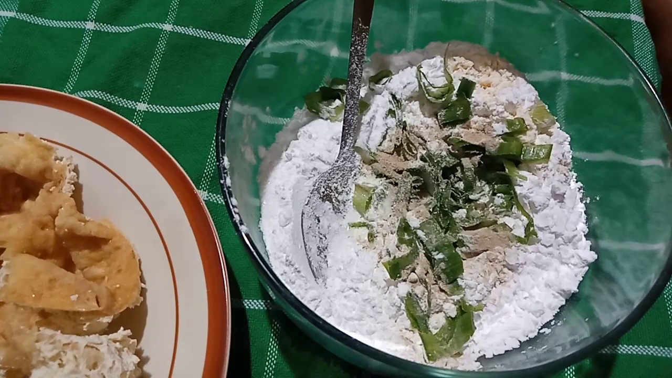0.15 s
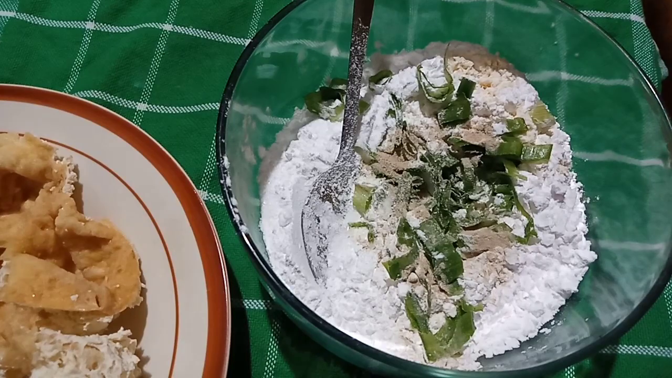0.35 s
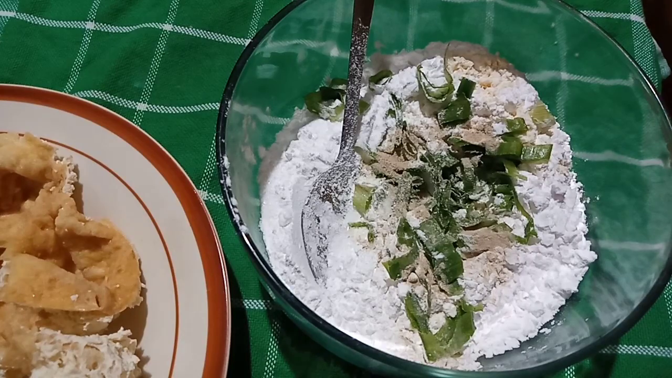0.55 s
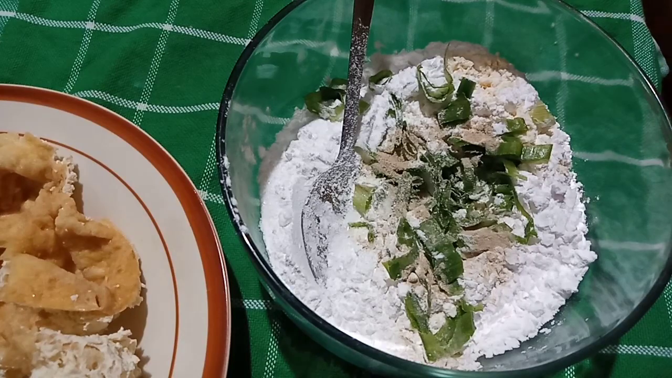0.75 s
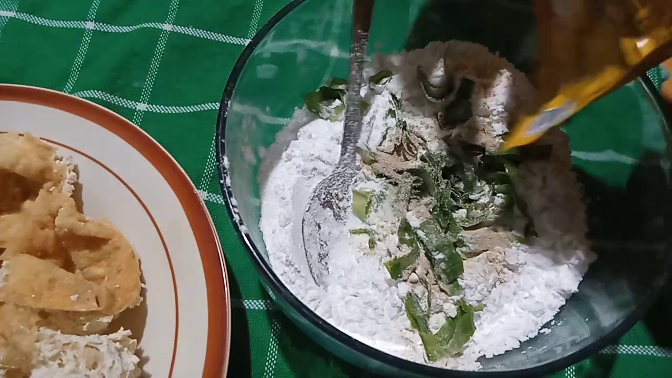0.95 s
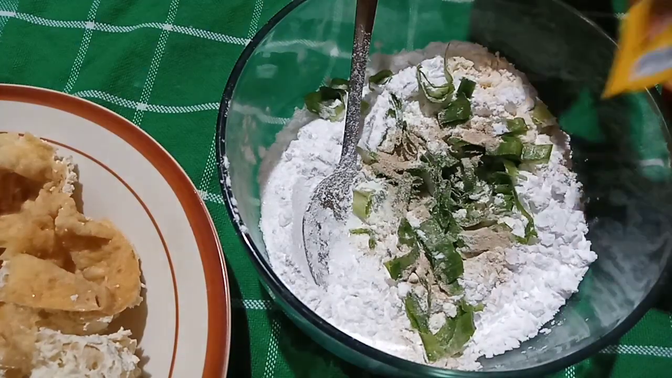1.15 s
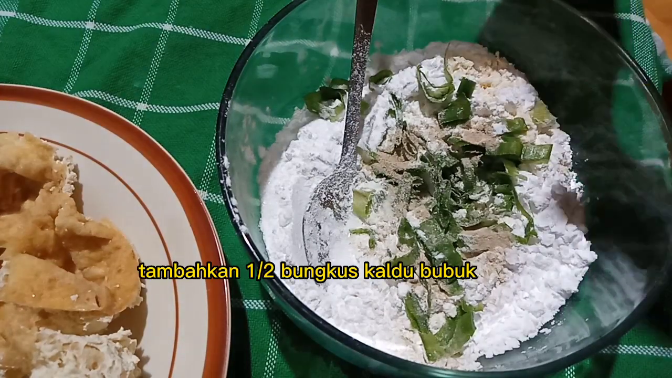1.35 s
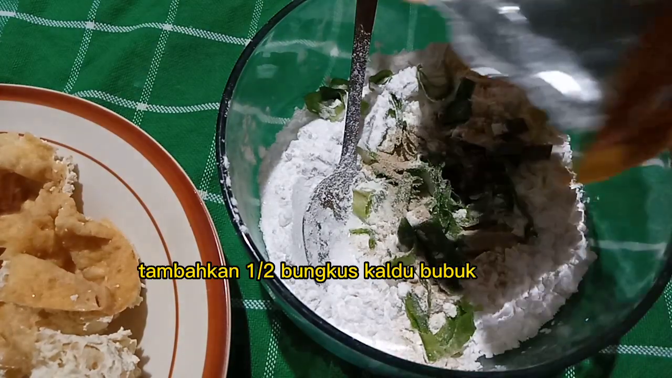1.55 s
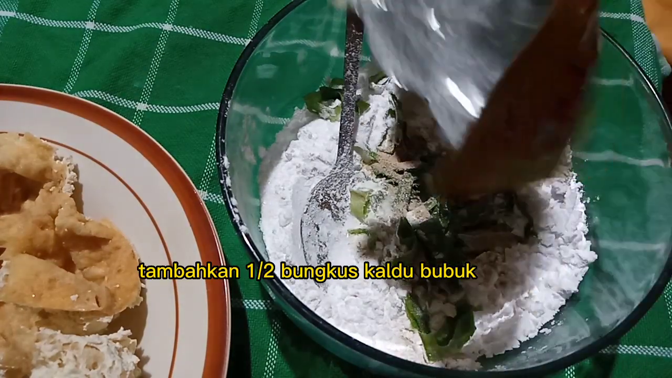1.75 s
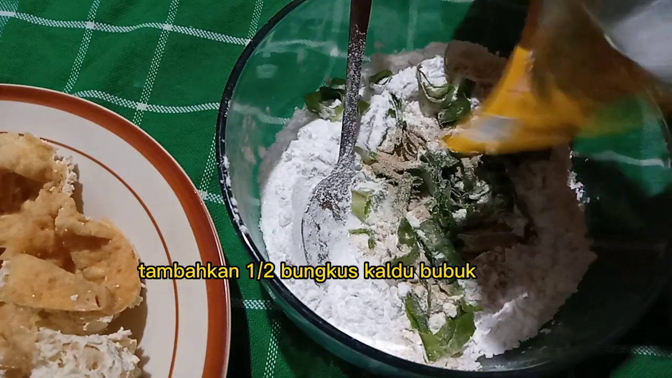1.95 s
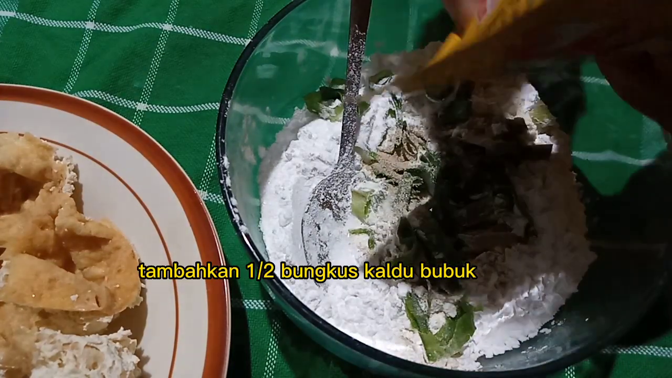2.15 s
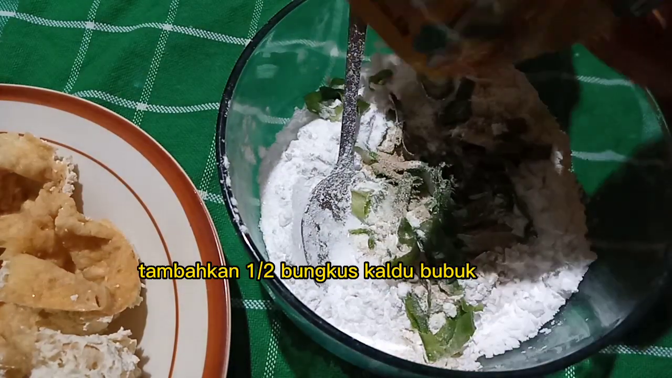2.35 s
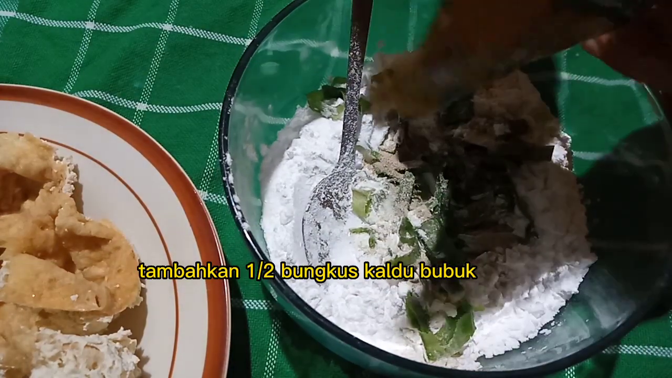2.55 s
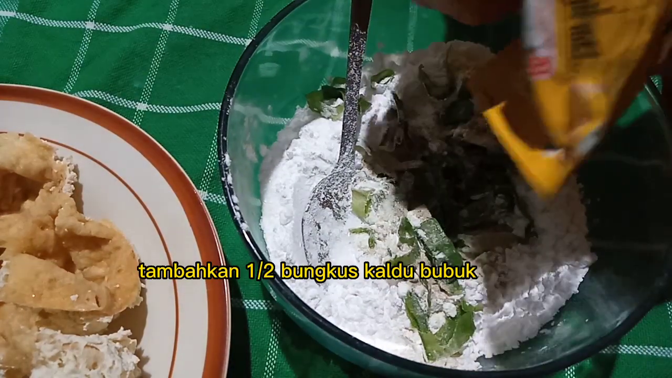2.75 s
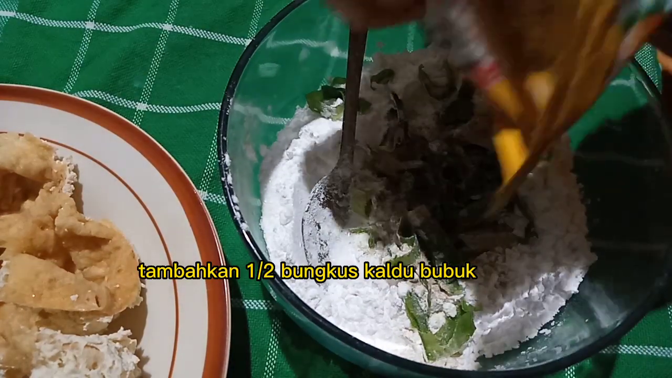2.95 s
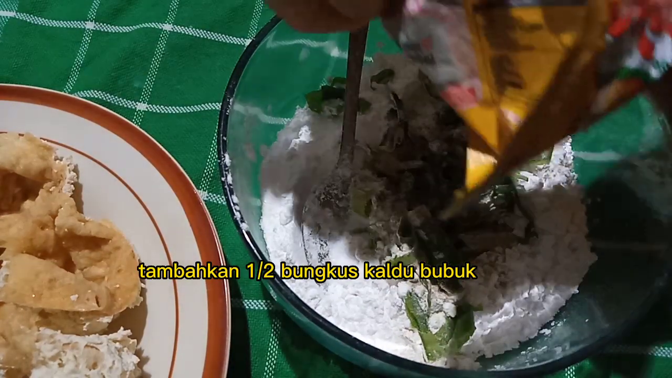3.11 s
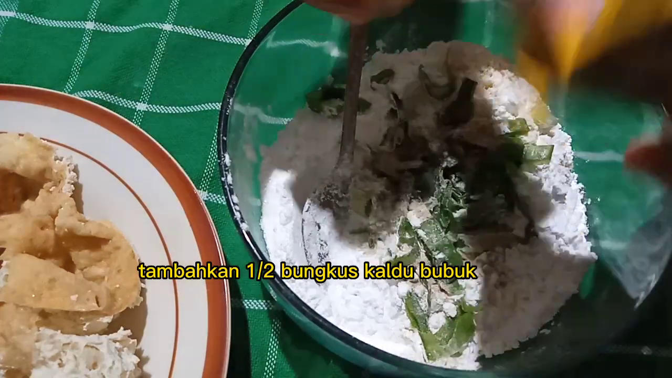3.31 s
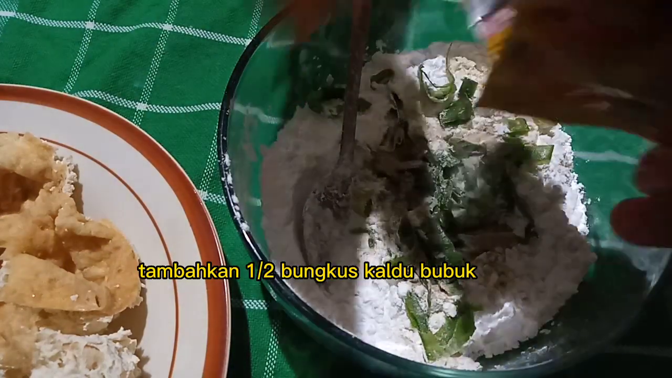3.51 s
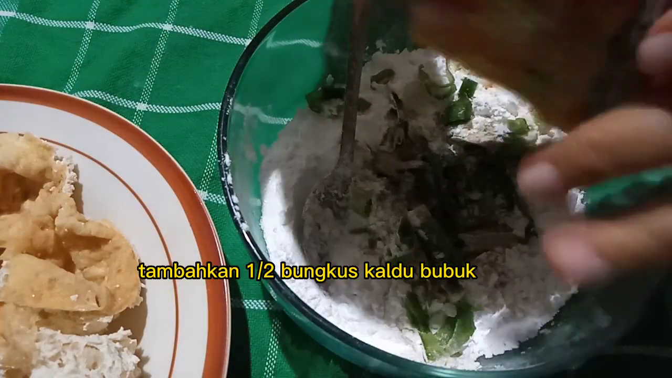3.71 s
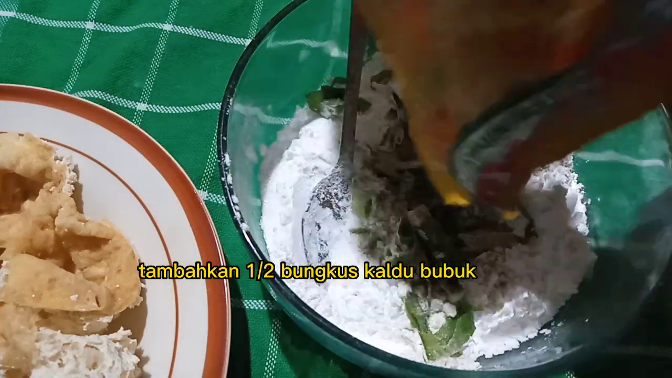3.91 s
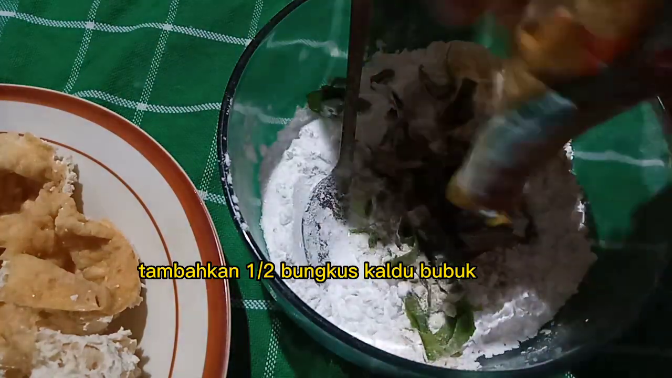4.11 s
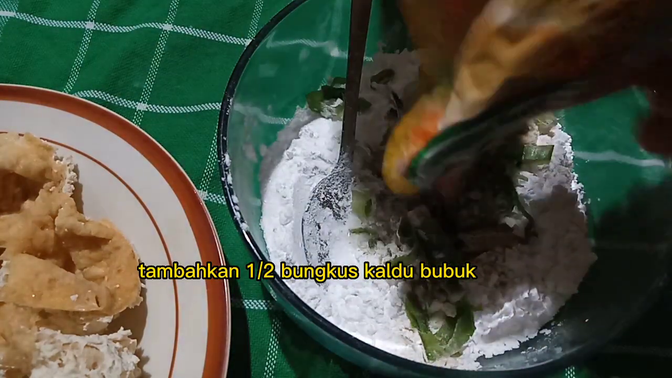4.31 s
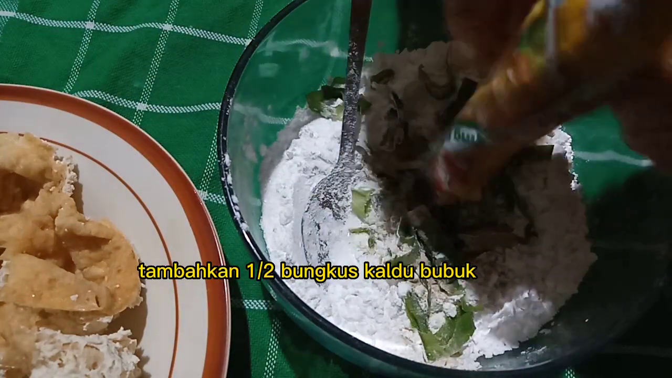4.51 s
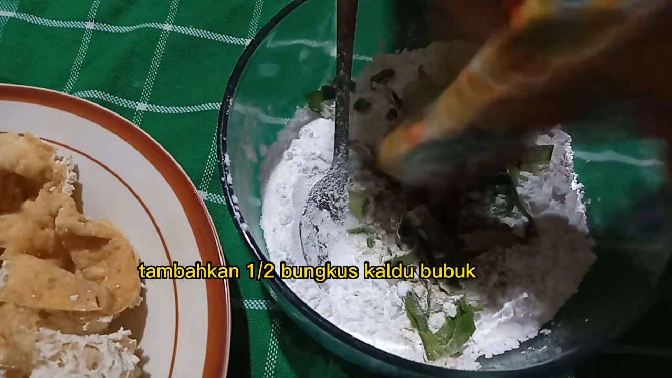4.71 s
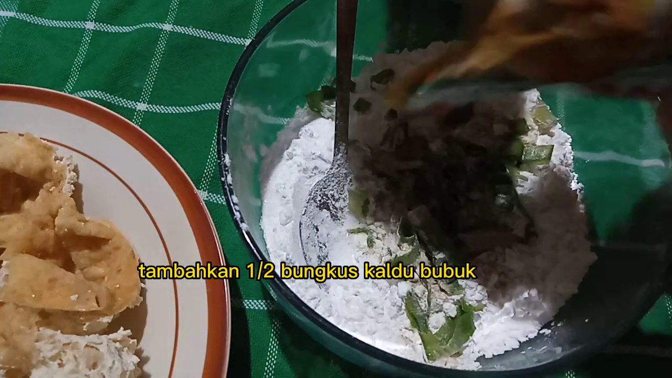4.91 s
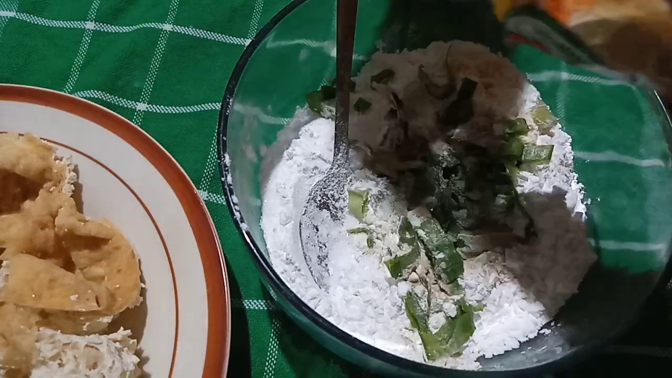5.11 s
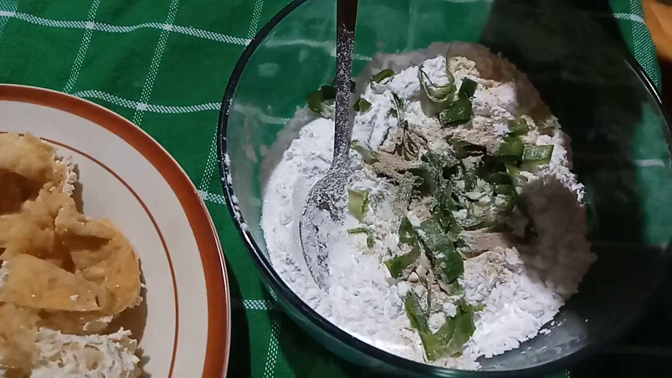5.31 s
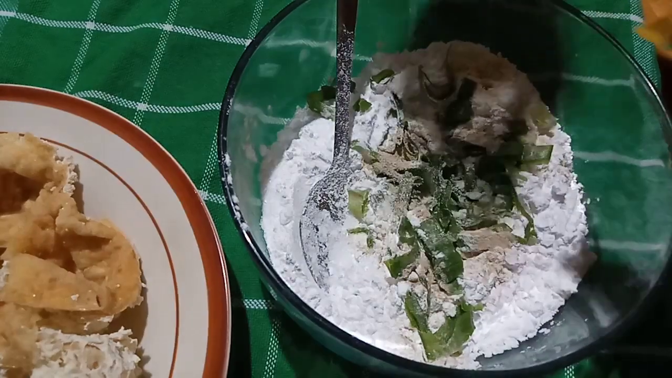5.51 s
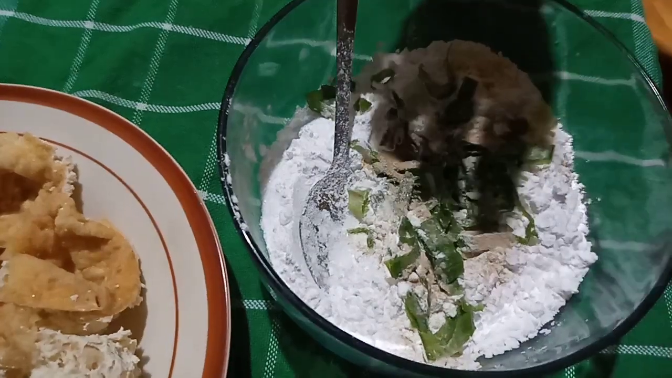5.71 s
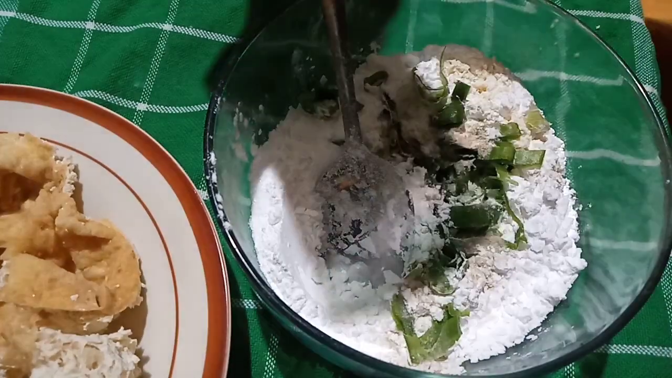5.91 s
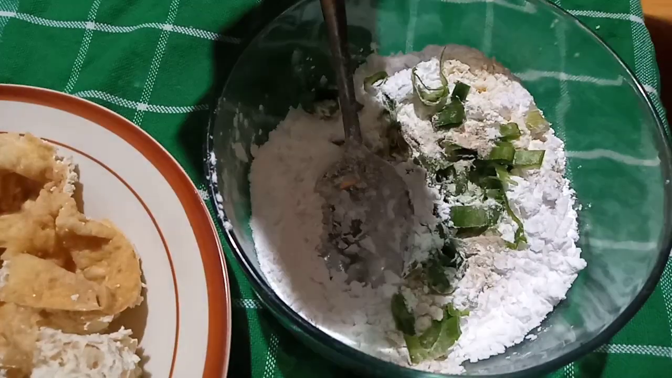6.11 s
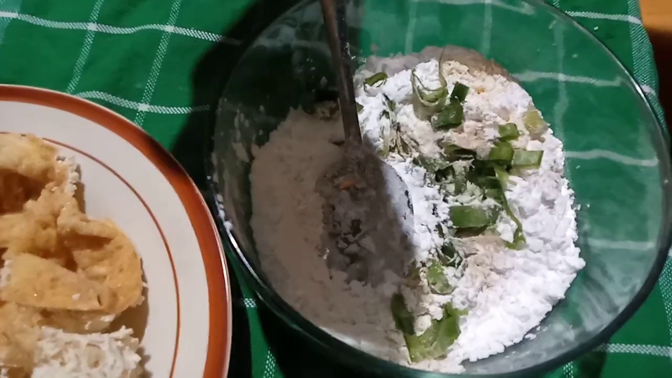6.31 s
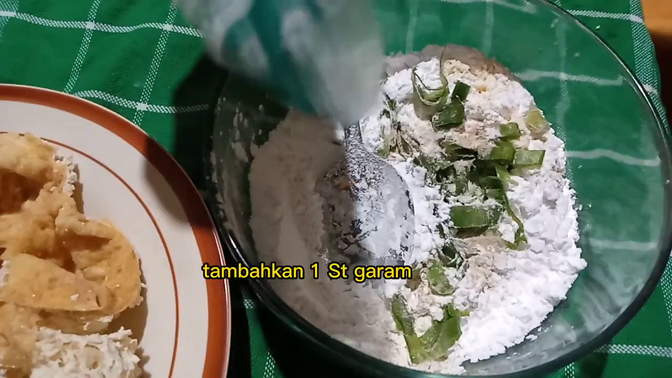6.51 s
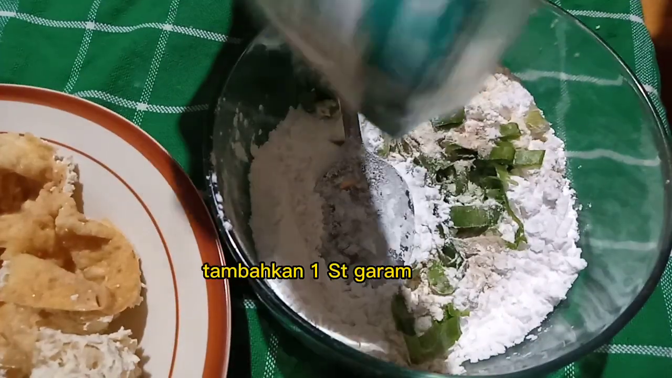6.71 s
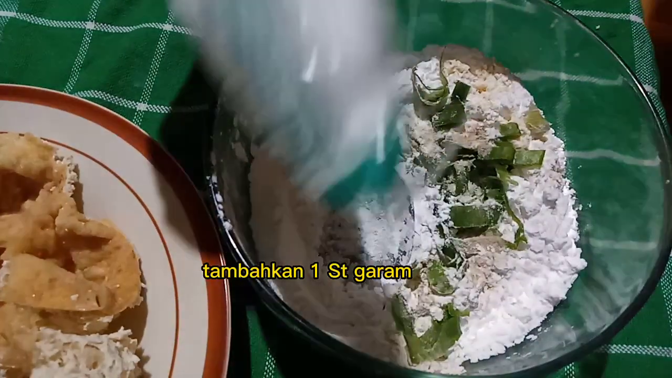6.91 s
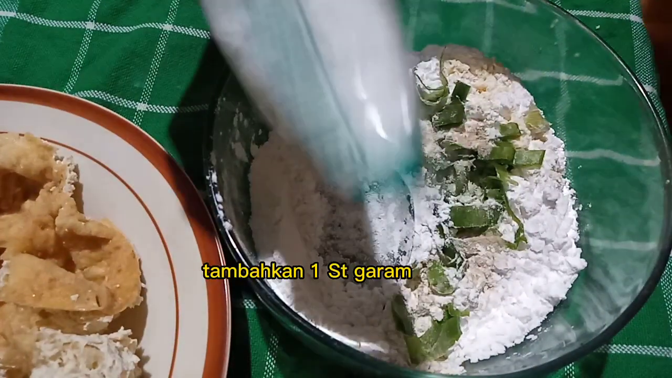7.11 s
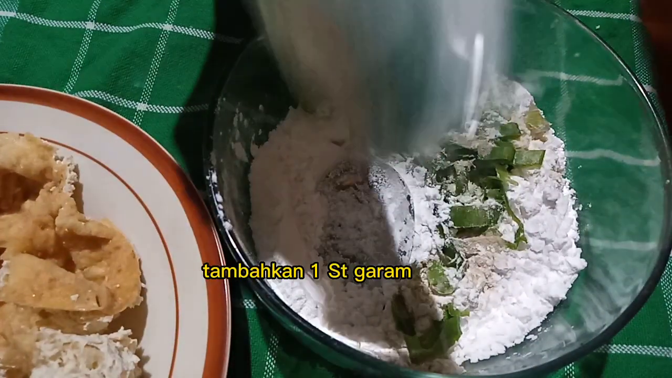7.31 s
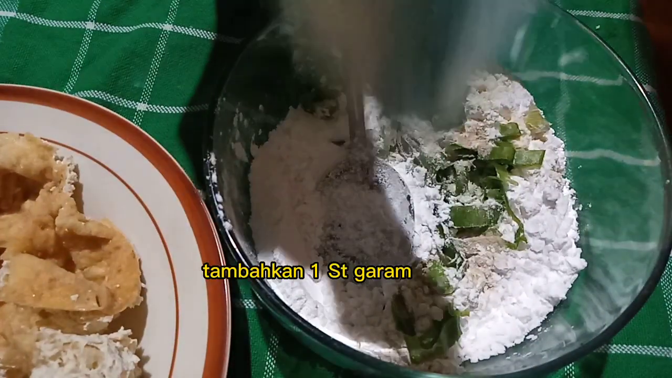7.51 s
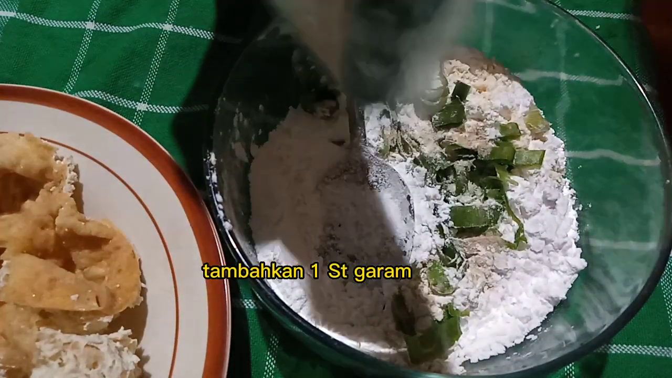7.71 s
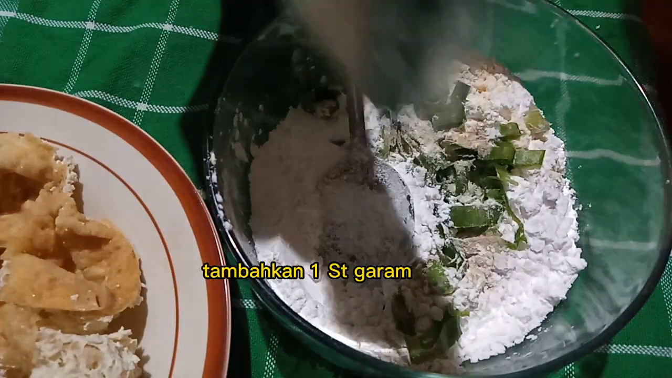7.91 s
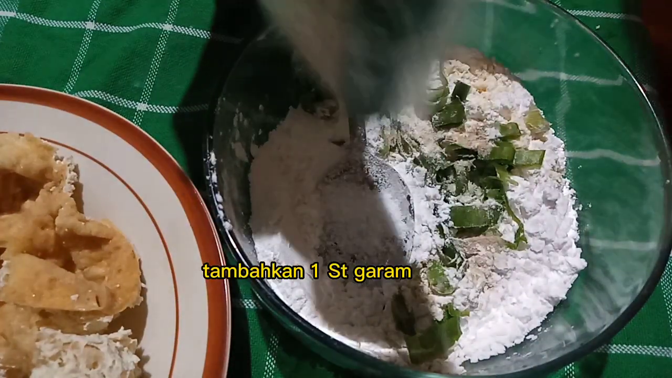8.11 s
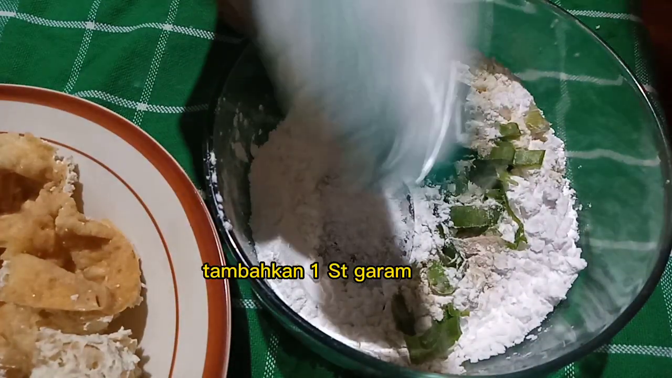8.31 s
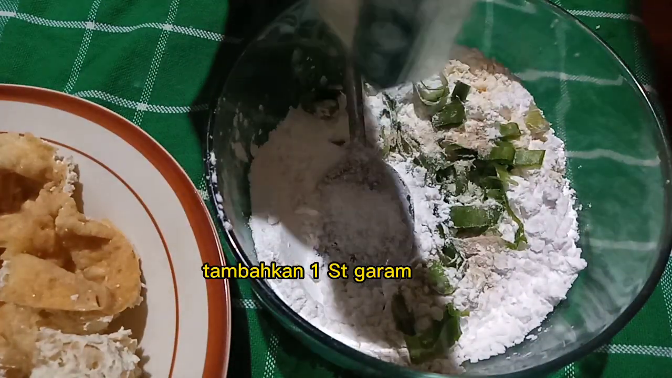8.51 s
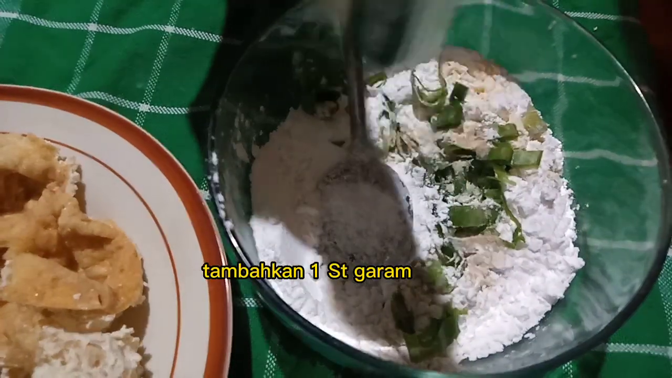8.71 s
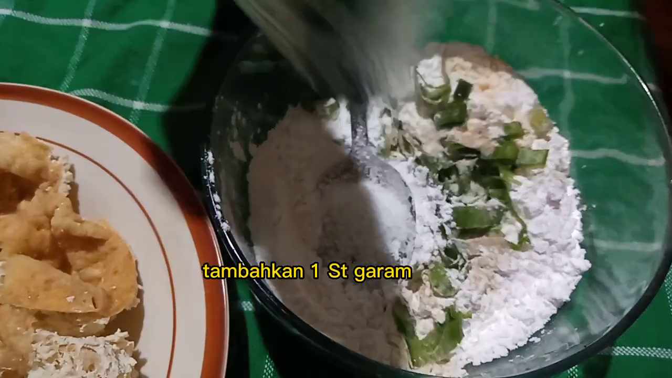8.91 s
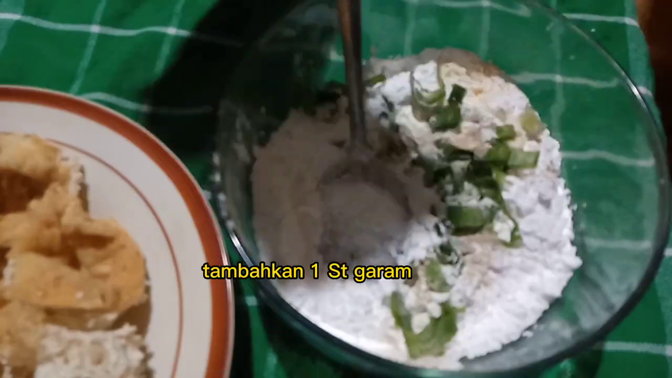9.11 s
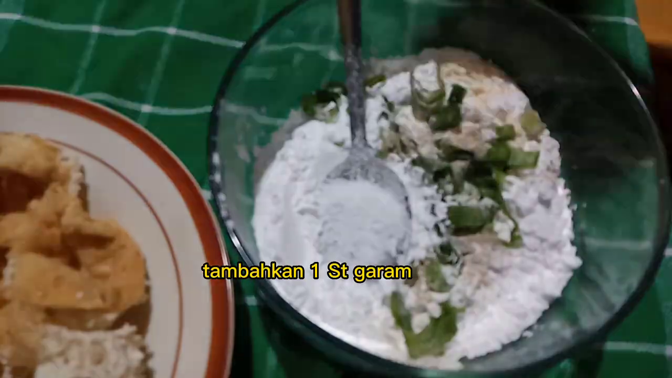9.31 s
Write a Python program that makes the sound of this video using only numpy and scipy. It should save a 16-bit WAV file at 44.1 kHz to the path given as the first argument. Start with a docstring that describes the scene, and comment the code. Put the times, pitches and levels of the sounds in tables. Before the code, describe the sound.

A foil seasoning sachet crackles and is shaken quickly over a glass bowl, then a plastic salt bag crinkles in bursts in a quiet kitchen.

```python
"""Kitchen: a foil seasoning sachet is shaken and squeezed over a glass bowl of flour; salt is pinched from a plastic bag.
Film rustle is coloured grains and noise under stroke envelopes; creases tick as damped sines and snap as resonated pushes.
Bumps knock with one low decaying sine; the bowl adds four faint resonances, a near surface one echo and a short tail.
Behind: rumble and hiss of filtered noise, a faint cricket of chirped narrowband noise, a far engine of firing harmonics."""
import sys
import numpy as np
from scipy import signal
from scipy.fft import rfft, irfft, next_fast_len
from scipy.io import wavfile
from scipy.ndimage import uniform_filter1d, map_coordinates

SR = 44100
rng = np.random.default_rng(int(sys.argv[2]) if len(sys.argv) > 2 else 0)


def transcribe(u):
    """Save the signal u as a 16-bit wav file named by the first command-line argument.

    u: samples, shape (n,) or (channels, n), limited to [-1, 1]; the rate is SR.
    q: integer samples, one column per channel.
    """
    v = np.clip(np.atleast_2d(u).T, -1, 1)
    q = np.round(v * 32767).astype(np.int16)
    wavfile.write(sys.argv[1], SR, q)


N = 412335
TIME_S = np.arange(N) / SR

# room background: t/s, rumble level/dB, hiss level/dB
ROOM_LEVELS = [(0, -51.5, -59), (.8, -52.5, -58), (1.7, -55, -56.5), (2.6, -52.5, -64), (5.5, -53.5, -56),
               (5.85, -53, -62), (6.3, -55, -55), (9.1, -53.5, -62), (9.22, -57, -50.5)]
# rumble spectrum: f/Hz, gain/dB
RUMBLE_COLOUR = [(20, -29), (62, -4), (90, -3), (170, -3.5), (260, -7), (420, -14), (600, -29.5),
                 (1200, -44), (4000, -70)]
# hiss spectrum: f/Hz, gain/dB
HISS_COLOUR = [(750, -27), (1450, -9), (2000, -12), (2300, 2.5), (2700, -13.5), (3000, -5.5), (3480, -8),
               (3680, -13.5), (4650, -23.5), (5500, -46), (6700, -29), (8200, -40), (15500, -43)]
# far engine: t/s, firing rate/Hz, level/dB
ENGINE_RUN = [(0, 45.3, -74), (4.6, 38.5, -58.5), (5.5, 40.8, -51.5), (6.1, 34.8, -60.5), (9.35, 38.6, -58)]
# exhaust harmonics: multiple of firing rate/1, relative level/dB
EXHAUST_HARMONICS = [(4, 2.5), (5, 0.5), (6, -1), (7, -5.5), (8, -3), (10, -1.5)]
# faint stirring of the packet held in the fingers: t/s, level/dB
STIRRING_LEVEL = [(0, -67), (1.4, -59.5), (1.6, -77.5), (2.2, -60), (3.5, -66), (5.6, -78.5), (6.6, -59),
                  (9.35, -58.5)]
# flapping of the whole packet relative to its crackle, strong when it swings freely: t/s, level/dB
FLAPPING_LEVEL = [(1, -18.5), (2.2, -9), (3.05, -10), (3.35, -5), (4, -4), (4.3, -8.5), (4.6, -5.5),
                  (5.4, -4.5), (6.15, -15.5), (6.6, -11.5), (9.35, -13)]
# strokes of the hand on the film: t/s, length/s (before limiting), level/dB
HAND_STROKES = [(.05, .012, -50.5), (.31, 0.077, -61.5), (.62, .025, -56), (.786, 0.0086, -52),
                (.969, 0.017, -43.5), (1.2, 0.064, -53.5), (1.339, 0.044, -47.5), (2.029, 0.052, -49.5),
                (2.129, 0.0087, -40), (2.185, 0.024, -42), (2.266, .07, -51.5), (2.398, 0.058, -47),
                (2.671, 0.015, -32.5), (2.761, 0.022, -32.5), (2.937, .05, -29), (3.063, 0.039, -30.5),
                (3.3, 0.15, -47), (3.39, .05, -48.5), (3.455, 0.033, -42), (5.06, .017, -41),
                (5.332, 0.022, -49.5), (5.396, 0.031, -46), (5.879, 0.079, -43.5), (6.083, 0.073, -45),
                (6.205, 0.049, -41.5), (6.33, 0.048, -41.5), (6.59, 0.026, -29), (6.7, 0.036, -42),
                (6.798, 0.03, -39), (6.858, 0.048, -31), (7.119, 0.086, -44), (7.276, 0.02, -41),
                (7.358, .02, -34), (7.409, 0.031, -31), (7.559, .017, -33), (7.61, 0.087, -40),
                (7.825, 0.056, -44), (7.972, 0.018, -32.5), (8.026, 0.043, -37), (8.188, 0.06, -38.5),
                (8.331, 0.025, -34.5), (8.378, 0.068, -40.5), (8.62, 0.054, -37.5), (8.803, 0.026, -33),
                (8.847, 0.027, -33.5), (9.17, 0.021, -37)]
# film crackle spectrum, sachet: f/Hz, gain/dB
SACHET_COLOUR = [(500, -22.5), (1000, -12.5), (1400, -3.5), (2000, 1), (2900, 4.5), (3900, -4), (4700, -11),
                 (5600, -23.5), (7200, -19), (10000, -39), (15500, -42.5)]
# film crackle spectrum, salt bag: f/Hz, gain/dB
BAG_COLOUR = [(500, -44), (1000, -24), (1450, 0.5), (2000, -2.5), (3100, 1), (4050, -3.5), (4800, -14.5),
              (5500, -22.5), (7200, -19.5), (10000, -38.5), (15500, -38)]
# spectrum of the flapping packet: f/Hz, gain/dB
FLAP_COLOUR = [(30, -65), (150, -3.5), (400, -3.5), (580, 2), (850, 0), (1120, -3), (1500, -22.5),
               (3000, -14), (6000, -57)]
# spectrum of buckling creases: f/Hz, gain/dB
CREASE_COLOUR = [(30, -23), (300, 8), (1000, -4), (3000, -0.5), (4000, -3), (4800, -15.5), (5600, -21.5),
                 (7000, -16.5), (10000, -32.5), (15500, -35)]
# modes of the glass bowl under the packets: f/Hz, Q/1, level/dB
BOWL_MODES = [(561, 13.4, -10.5), (1135, 34, -6.5), (1213, 13.3, -2), (1358, 13.5, -3.5)]
# pickup by the bowl, greatest while the sachet is lowered into it: t/s, gain/dB
BOWL_PICKUP = [(3.8, -2.5), (4.6, 2.5), (5.2, -1)]
# loudest creases that buckle: t/s, relative level/dB, ring f/Hz
CREASE_SNAPS = [(.0907, -37, 2500), (1.1605, -32.5, 2490), (1.283, -34.5, 1916), (2.4034, -28, 4230),
                (2.4735, -20, 2300), (2.65, -14, 2924), (2.671, -18, 1698), (2.7545, -7.5, 2510),
                (2.8641, -26.5, 4105), (2.907, -12.5, 1465), (2.9536, -12.5, 2735), (2.9634, -21.5, 3095),
                (3.0211, -32.5, 1301), (3.1242, -24, 1486), (3.3054, -25, 2590), (3.4467, -23, 2560),
                (3.499, -19.5, 2280), (3.9173, -22, 2960), (3.988, -25, 1691), (4.0385, -21, 2933),
                (4.2379, -12.5, 2042), (4.3472, -18, 3115), (4.4356, -15.5, 1619), (4.494, -20, 1557),
                (4.6049, -16.5, 1224), (4.665, -14, 2446), (4.6885, -20.5, 2052), (4.724, -17, 2218),
                (4.7315, -21, 905), (4.8437, -19, 2334), (4.9034, -15, 1310), (4.9152, -21, 956),
                (5.3635, -35, 3450), (5.4335, -24, 3000), (5.7803, -22.5, 2130), (5.8217, -25, 2260),
                (6.3317, -17.5, 2690), (6.5213, -25.5, 1254), (6.6533, -28, 2323), (6.8485, -21.5, 2035),
                (6.9325, -21.5, 2110), (6.958, -22, 2920), (6.9978, -14.5, 1860), (7.083, -17.5, 2885),
                (7.145, -28, 1703), (7.2363, -21, 2140), (7.4195, -17, 4013), (7.4812, -25, 3376),
                (7.5964, -8, 2647), (7.6477, -24, 1590), (7.6888, -17.5, 1840), (7.782, -19.5, 3680),
                (7.7931, -21, 3300), (7.8225, -25.5, 2170), (7.844, -27.5, 1000), (7.8914, -32.5, 3000),
                (7.9352, -30.5, 4030), (8.0363, -27, 1274), (8.0878, -24, 3163), (8.1124, -29.5, 1630),
                (8.147, -25, 3024), (8.2981, -26.5, 3400), (8.3475, -16.5, 3530), (8.452, -25.5, 3330),
                (8.584, -19.5, 3930), (8.641, -21.5, 3114), (8.7117, -31, 1693), (8.7815, -23, 4400),
                (8.9221, -30.5, 1495), (8.9892, -32, 1428), (9.0486, -23.5, 2950), (9.0962, -28, 1690),
                (9.1805, -20.5, 3940)]
# overall gain, with a brief dip: t/s, gain/dB
LEVEL_DIP = [(.805, -1), (.825, -31), (.925, -14.5), (.95, -4.5)]
# cricket: t/s, level/dB
CRICKET_LEVEL = [(.9, -87), (1.05, -66.5), (2.5, -74.5), (3.6, -63), (5.5, -71.5), (7.2, -62.5),
                 (9.35, -58)]
# hollow knocks: t/s, level/dB, ring f/Hz, t60/s
HOLLOW_KNOCKS = [(1.325, -37.5, 427, 0.07), (2.264, -21, 658, 0.027), (3.844, -18, 466, 0.015),
                 (4.178, -28.5, 361, 0.11)]
# how hard the sachet is shaken empty: t/s, level/dB
SHAKING_LEVEL = [(3.62, -67.5), (3.7, -39.5), (3.92, -41), (4.1, -38.5), (4.28, -32.5), (4.62, -28),
                 (4.76, -30), (4.84, -36.5), (4.92, -33.5), (4.97, -37.5), (5.07, -41), (5.1, -69.5)]


def amp(db):
    """Decibels to gain."""
    return 10 ** (np.asarray(db) / 20)


def unit(x):
    """Scale to rms 1."""
    return x / np.sqrt(np.mean(x ** 2) + 1e-20)


def curves(rows):
    """Interpolate each column after the time to one value per sample."""
    time_s, *columns = np.transpose(rows)
    return [np.interp(TIME_S, time_s, column) for column in columns]


def wobble(rate_hz):
    """Smooth random curve through rate_hz knots a second."""
    knots = rng.standard_normal(int(N * rate_hz / SR) + 4)
    return map_coordinates(np.clip(knots, -2, 2), [TIME_S * rate_hz])


def colour(x, points, size=4096):
    """Causal minimum-phase filter, gain interpolated over log frequency."""
    hz, db = np.transpose(points)
    log_hz = np.log(np.fft.rfftfreq(size, 1 / SR) + 1)
    log_gain = np.log(amp(np.interp(log_hz, np.log(hz), db)))
    # fold the cepstrum onto positive time
    cepstrum = irfft(log_gain)
    cepstrum[1:size // 2] *= 2
    cepstrum[size // 2 + 1:] = 0
    impulse = irfft(np.exp(rfft(cepstrum)))
    return signal.fftconvolve(x, impulse)[:len(x)]


def resonate(x, hz, q):
    """One damped resonance with unit gain at its peak."""
    f = np.fft.rfftfreq(len(x), 1 / SR)
    loss = 1j * f * hz / max(q, .2)
    return irfft(rfft(x) * loss / (hz * hz - f * f + loss), len(x))


def patchy(x, depth_db, patch_hz, patch_s, size=512):
    """Patches of random gain in time and frequency: resonances that come and go."""
    hz, t, spectrum = signal.stft(x, SR, nperseg=size)
    rows, cols = np.meshgrid(hz / patch_hz, t / patch_s, indexing="ij")
    knots = rng.standard_normal((int(rows.max()) + 2, int(cols.max()) + 2))
    field = map_coordinates(knots, [rows, cols], order=1)
    spectrum = spectrum * amp(depth_db * unit(field))
    return unit(signal.istft(spectrum, SR, nperseg=size)[1][:N])


def background():
    """Wavering low rumble and fine hiss, both patchy filtered noise."""
    rumble_db, hiss_db = curves(ROOM_LEVELS)
    churn = patchy(rng.standard_normal(N), depth_db=2.5, patch_hz=35.06, patch_s=0.15, size=4096)
    air = patchy(rng.standard_normal(N), depth_db=2.45, patch_hz=482, patch_s=0.025)
    rumble = amp(rumble_db) * unit(colour(churn, RUMBLE_COLOUR))
    return rumble + amp(hiss_db) * unit(colour(air, HISS_COLOUR))


def engine():
    """Low firing harmonics of a far exhaust, each wavering in phase on its way."""
    firing_hz, level_db = curves(ENGINE_RUN)
    phase_rad = 2 * np.pi * np.cumsum(firing_hz) / SR
    exhaust = np.zeros(N)
    for multiple, db in EXHAUST_HARMONICS:
        exhaust += amp(db) * np.sin(multiple * phase_rad + wobble(5.3))
    return amp(level_db) * unit(exhaust)


def effort(stir_db, stir_hz):
    """Strokes, shakes and stirring fingers drive the crackle; a share of it makes the packet flap."""
    held_db, = curves(STIRRING_LEVEL)
    flap_db, = curves(FLAPPING_LEVEL)
    stirring = amp(held_db + stir_db * wobble(stir_hz))
    crackle = np.sqrt(swells(HAND_STROKES) ** 2 + shaking() ** 2 + stirring ** 2)
    return crackle, amp(flap_db) * crackle


def grains(rate_hz, spread_db, rub):
    """Tiny buckles of random size and sign on a bed of sliding noise."""
    buckles = rng.random(N) < rate_hz / SR
    size_db = spread_db * np.clip(rng.standard_normal(N), -2, 2)
    sign = np.sign(rng.standard_normal(N))
    return unit(buckles * sign * amp(size_db)) + rub * rng.standard_normal(N)


def tauten(body, flap, edge_hz, taut_db):
    """Film pulled harder is stiffer and loses its lowest flapping."""
    highpass = signal.butter(2, edge_hz, "highpass", fs=SR, output="sos")
    taut = unit(signal.sosfilt(highpass, body))
    share = flap ** 2 / (flap ** 2 + amp(taut_db) ** 2)
    return np.sqrt(1 - share) * body + np.sqrt(share) * taut


def rustle(crackle, flap, crackle_db, flap_db, flutter_db):
    """Dense crackle of sliding film over duller flapping of the packet; colour shifts as it bends."""
    bag_from_s = 5.6  # the sachet gives way to the salt bag
    slide = patchy(grains(rate_hz=2400, spread_db=7.5, rub=0.4),
                   depth_db=2.5, patch_hz=403.4, patch_s=.012, size=256)
    sachet = unit(colour(slide, SACHET_COLOUR))
    bag = unit(colour(slide, BAG_COLOUR))
    film = np.where(TIME_S < bag_from_s, sachet, bag)
    bends = patchy(grains(rate_hz=800, spread_db=6.0, rub=0.52), depth_db=4.0, patch_hz=172.6, patch_s=.02)
    body = tauten(unit(colour(bends, FLAP_COLOUR)), flap, edge_hz=670, taut_db=-40)
    grip = unit(amp(flutter_db * wobble(160)))  # the film sticks and slips
    return grip * (amp(crackle_db) * crackle * film + amp(flap_db) * flap * body)


def ticks(crackle, level_db, spread_db, hz, cycles, bunching, count=620, size=256):
    """Small creases give way at random, each at its own pitch, harder and more often under strain."""
    t = np.arange(size) / SR
    strain = np.abs(uniform_filter1d(crackle, size=SR // 20))[:N - size]
    chance = np.cumsum(strain ** bunching)
    start = np.searchsorted(chance, chance[-1] * rng.random(count))
    strength, pitch = np.clip(rng.standard_normal((count, 2)), -1.6, 1.6).T
    turns = hz * np.exp(.4 * pitch)[:, None] * t
    gain = strain[start] * amp(level_db + spread_db * strength)
    rings = gain[:, None] * np.sin(2 * np.pi * turns) * np.exp(-turns / cycles)
    places = start[:, None] + np.arange(size)
    return colour(np.bincount(places.ravel(), rings.ravel(), N), CREASE_COLOUR)


def bowl(x):
    """The bowl picks up the sound held over it and rings faintly in its modes."""
    pickup_db, = curves(BOWL_PICKUP)
    picked_up = amp(pickup_db) * x
    return x + sum(amp(db) * resonate(picked_up, hz, q) for hz, q, db in BOWL_MODES)


def kitchen(x, wall_s, wall_db, tail_db, t60_s):
    """One near surface echoes, over a short weak tail of decaying noise."""
    t = np.arange(SR // 3) / SR
    tail = rng.standard_normal(len(t)) * amp(-60 * t / t60_s) * (t > .002)
    answer = amp(tail_db) * tail / np.linalg.norm(tail)
    answer[round(wall_s * SR)] += amp(wall_db)
    return x + signal.fftconvolve(x, answer)[:N]


def swells(rows):
    """Film strain under movements that swell and fade in the same rounded shape; powers add."""
    edge_db, squareness = -14.0, 1.9  # level one length from the peak; flatness of top, steepness of sides
    power = np.zeros(N)
    for peak_s, length_s, db in rows:
        near = slice(*np.searchsorted(TIME_S, [peak_s - .25, peak_s + .25]))
        age = np.abs(TIME_S[near] - peak_s) / np.clip(length_s, .008, .09)
        power[near] += amp(db + edge_db * age ** squareness) ** 2
    return np.sqrt(power)


def snaps(level_db, q, shiver, lead_t60_s, shiver_t60_s, size=2048):
    """A crease creaks, flips in one push, shivers for some milliseconds and rings its patch of film."""
    out = np.zeros(N + size)
    t = (np.arange(size) - size // 2) / SR
    envelope = amp(-60 * np.maximum(t / shiver_t60_s, -t / lead_t60_s))
    for flip_s, db, hz in CREASE_SNAPS:
        push = shiver * rng.standard_normal(size) * envelope
        push[size // 2] += 1
        snap = colour(resonate(push, hz, q), CREASE_COLOUR)
        start = round(flip_s * SR) - size // 2
        out[start:][:size] += amp(db + level_db) * unit(snap)
    return out[:N]


def cricket(hz, width_hz, gap_s, chirp_s, uneven_db, count=130):
    """Uneven chirps of a narrow wing resonance, smeared by distance."""
    level_db, = curves(CRICKET_LEVEL)
    q = hz / width_hz
    wing = unit(resonate(resonate(rng.standard_normal(N), hz, q), hz, q))
    start_s = np.cumsum(gap_s * np.exp(.16 * rng.standard_normal(count)))
    strength = amp(uneven_db * rng.uniform(-1.1, 1, count))
    beats = np.bincount((start_s * SR).astype(int), strength, N)[:N]
    age = TIME_S[:SR // 2] / chirp_s
    chirps = signal.fftconvolve(beats, age ** 2 * np.exp(-2 * age))[:N]
    return amp(level_db) * wing * unit(chirps)


def knocks(attack_s):
    """Soft bumps with one low, quickly damped mode."""
    out = np.zeros(N)
    t = np.arange(SR // 8) / SR
    for hit_s, db, hz, t60_s in HOLLOW_KNOCKS:
        envelope = amp(db - 60 * t / t60_s) * (1 - np.exp(-t / attack_s))
        out[round(hit_s * SR):][:len(t)] += envelope * np.sin(2 * np.pi * hz * t)
    return out


def shaking(count=12):
    """The wrist shakes about twelve times a second, a little faster each time; film slides in between."""
    first_s, gap_s, gap_ratio = 4.035, .0841, .9905  # first shake, first gap, each gap over the one before
    shake_s, shake_db, slide_db = 0.025, 2, -9.5  # levels relative to the shaking level
    level_db, = curves(SHAKING_LEVEL)
    gaps_s = gap_s * gap_ratio ** np.arange(count)
    peaks_s = first_s + np.cumsum(gaps_s) - gaps_s
    shakes = swells([(peak_s, shake_s, shake_db) for peak_s in peaks_s])
    return amp(level_db) * np.hypot(shakes, amp(slide_db))


def scene():
    """Packets close by, the rest far behind; the level dips briefly and returns somewhat lower."""
    crackle, flap = effort(stir_db=3.5, stir_hz=18.0)
    packets = rustle(crackle, flap, crackle_db=4.0, flap_db=5.5, flutter_db=4.0)
    packets += ticks(crackle, level_db=10.5, spread_db=4.0, hz=2444, cycles=2.66, bunching=.35)
    packets += snaps(level_db=-14.5, q=1.46, shiver=0.1, lead_t60_s=0.0057, shiver_t60_s=0.017)
    packets += knocks(attack_s=0.000082)
    near = kitchen(bowl(packets), wall_s=.0048, wall_db=-20.5, tail_db=-15.5, t60_s=0.17)
    far = background() + engine()
    far += cricket(hz=6600, width_hz=540, gap_s=.085, chirp_s=0.028, uneven_db=6.5)
    dip_db, = curves(LEVEL_DIP)
    return (amp(dip_db) * (near + far))[None]


def record(dry):
    """Remove everything above the band limit."""
    top_hz = 15800
    size = next_fast_len(N + SR // 2)
    keep = np.fft.rfftfreq(size, 1 / SR) < top_hz
    return irfft(rfft(dry, size) * keep, size)[..., :N]


dry = scene()
out = record(dry)
transcribe(out)
```